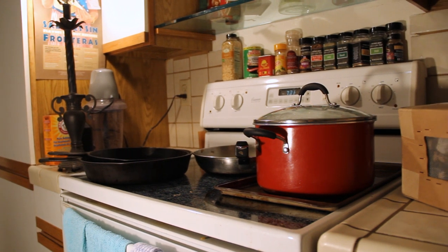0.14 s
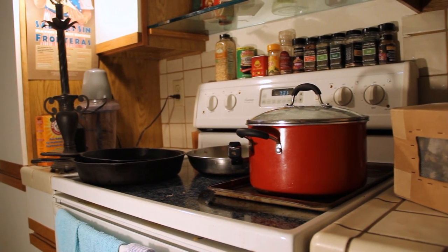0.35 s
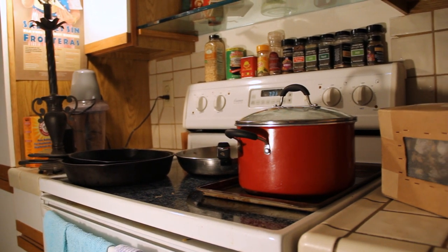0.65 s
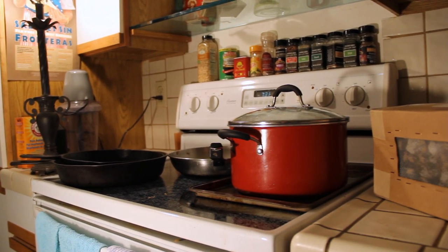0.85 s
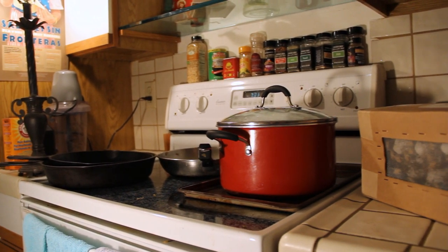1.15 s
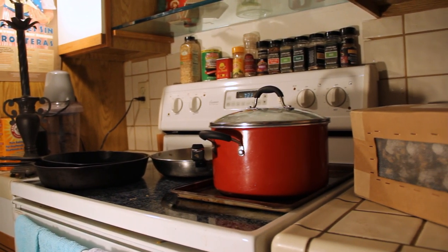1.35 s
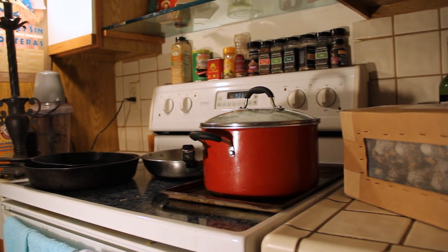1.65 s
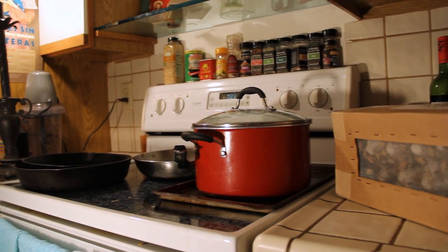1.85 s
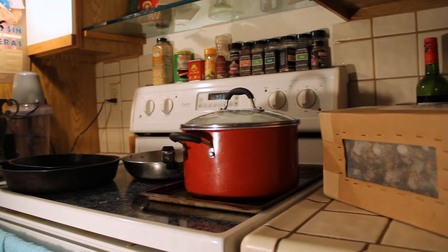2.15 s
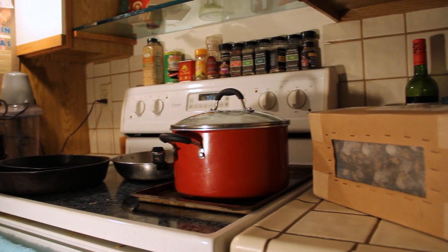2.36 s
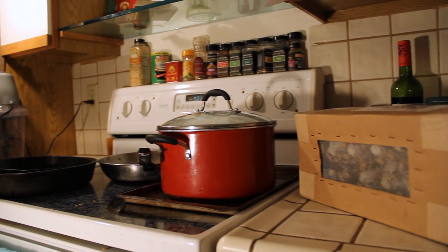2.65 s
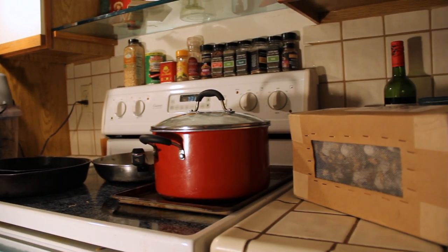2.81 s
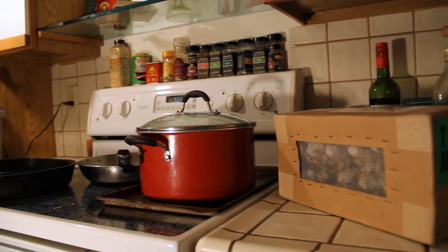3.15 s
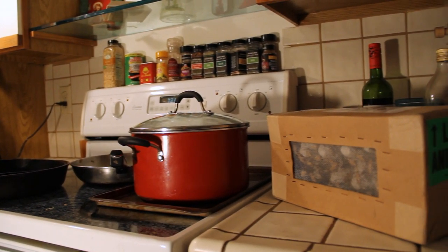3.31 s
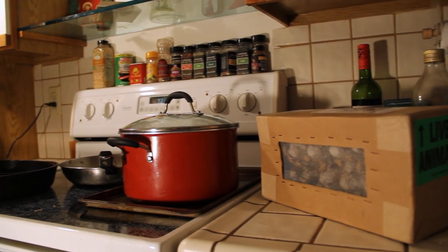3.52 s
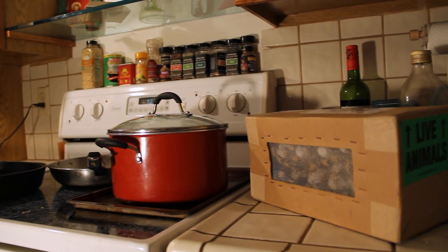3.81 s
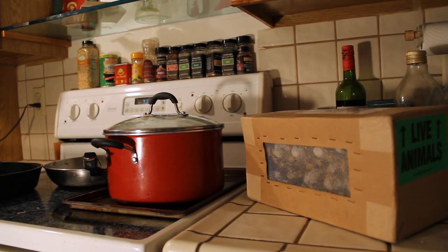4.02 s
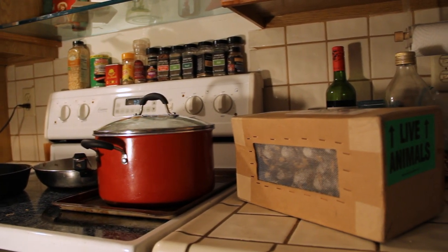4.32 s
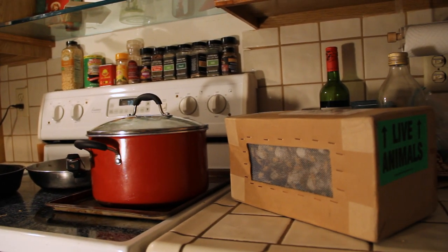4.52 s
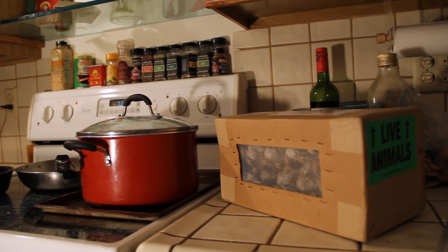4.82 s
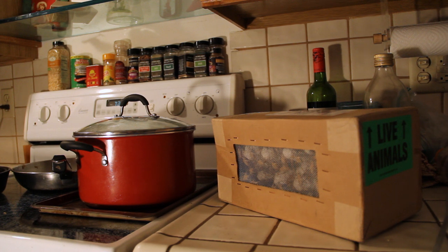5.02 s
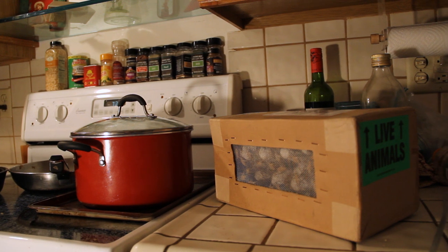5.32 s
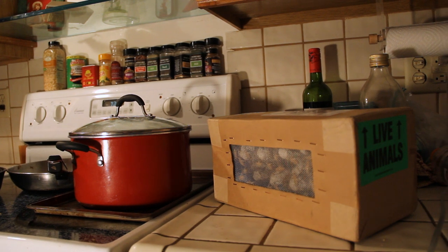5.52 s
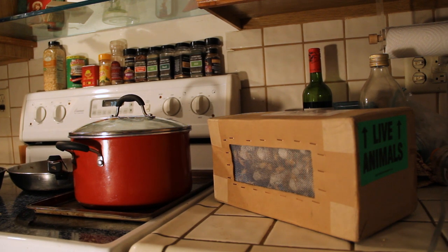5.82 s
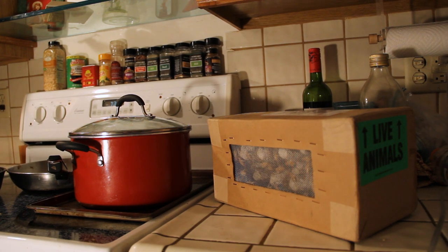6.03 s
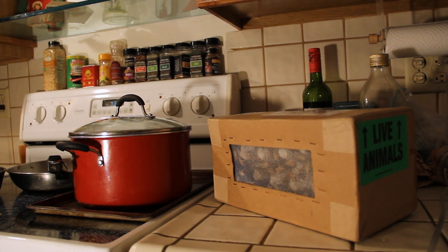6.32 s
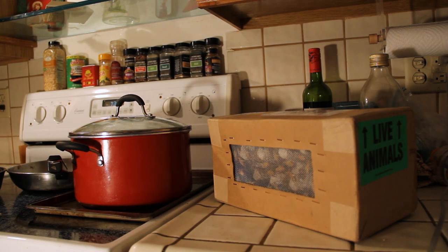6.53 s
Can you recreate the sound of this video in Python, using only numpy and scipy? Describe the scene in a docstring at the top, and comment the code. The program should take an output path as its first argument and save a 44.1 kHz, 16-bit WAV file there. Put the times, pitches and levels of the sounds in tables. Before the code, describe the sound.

A cricket chirps in a quiet kitchen, high-pitched and even, about seven times a second from start to end. A second, much fainter cricket adds dry, scratchy strokes at its own pace, drifting in and out of step and now and then catching a clear pip. An appliance hums softly behind them. One microphone hears it all from a fixed spot, with a short room echo.

```python
"""Crickets in a quiet kitchen

One microphone, indoors, with an appliance humming behind. A cricket chirps evenly, about seven times
a second: four wing strokes, each a falling whistle with its octave, coloured by close reflections and
a short room tail. Pairs of dry, scratchy strokes, likely a second cricket's, keep their own pace and
drift in and out of step with it."""
import sys
import numpy as np
from scipy import signal
from scipy.fft import rfft, irfft, next_fast_len
from scipy.io import wavfile
from scipy.ndimage import uniform_filter1d

SR = 44100
rng = np.random.default_rng(int(sys.argv[2]) if len(sys.argv) > 2 else 0)


def wav_out(sig):
    """Save sig, one row per channel (or a flat mono array), as 16-bit PCM at SR to the path in sys.argv[1]."""
    wavfile.write(sys.argv[1], SR, np.round(np.clip(np.atleast_2d(sig).T, -1, 1) * 32767).astype(np.int16))


N = 293629


def undb(db):
    """Decibels to gain."""
    return 10 ** (np.asarray(db) / 20)


def unit(x):
    """Scale to rms 1."""
    return x / np.sqrt(np.mean(x ** 2))


def add(track, s, sound):
    """Mix a sound into the track, starting at s seconds."""
    i = int(round(s * SR))
    a, b = max(i, 0), min(i + len(sound), len(track))
    if b > a:
        track[a:b] += sound[a - i:b - i]


def noise(colour):
    """Noise of rms 1, shaped by (frequency [Hz], level [dB]) points."""
    hz, db = np.transpose(colour)
    bins_hz = np.arange(N // 2 + 1) * SR / N
    gain = undb(np.interp(np.log(bins_hz + 1), np.log(hz), db))
    return unit(irfft(rfft(rng.standard_normal(N)) * gain, N))


def drift(rate_hz):
    """Smooth random drift of rms 1."""
    hold = int(SR / rate_hz)
    steps = np.repeat(rng.standard_normal(N // hold + 1), hold)
    return unit(uniform_filter1d(steps, hold)[:N])


def resonate(x, hz, width_hz):
    """One resonance, gain 1 at its centre."""
    return signal.lfilter(*signal.iirpeak(hz, hz / width_hz, fs=SR), x)


def room_tone(level_db=-62.0, waver_db=0.2):
    """The kitchen's air: a low, nearly steady noise."""
    # colour of the air: (frequency [Hz], relative density [dB])
    air = [(20, -2), (38, -9), (60, -8.5), (82, 4), (125, -1.5), (165, -9), (300, -9), (450, -7),
           (700, -12.5), (1300, -18.5), (2500, -24.5), (4000, -24.5), (9000, -23.5), (16000, -31)]
    return undb(level_db + waver_db * drift(2.96)) * noise(air)


def appliance_hum(waver_db=1.86, drift_hz=0.627):
    """Motor and mains lines, wavering slightly in pitch and level."""
    # lines of the hum: (frequency [Hz], rms level [dB])
    lines = [(59.2, -71.5), (78.5, -71.5), (87, -82), (120, -68.5), (237, -77), (249.5, -70), (295, -79),
             (472, -75.5), (500, -84.5), (531, -83), (599, -86.5), (749, -84.5)]
    hum = np.zeros(N)
    for hz, db in lines:
        cycles = np.cumsum(hz + drift_hz * drift(4.03)) / SR + rng.random()
        hum += np.sqrt(2) * undb(db + waver_db * drift(7)) * np.sin(2 * np.pi * cycles)
    return hum


def faint_tones():
    """A rising whine and drone, perhaps motors outside, and one brief low note."""
    # course of each tone: (time [s], frequency [Hz], rms level [dB])
    whine = [(0, 571, -73), (.12, 590, -71.5), (.24, 600, -70), (.31, 603, -74), (.42, 635, -97)]
    drone = [(1.2, 117, -97), (1.7, 130, -66.5), (2.5, 148.4, -81), (3.1, 164.6, -73.5), (3.6, 178, -76),
             (4.3, 187, -103)]
    blip = [(.08, 186, -88), (.16, 192, -68), (.22, 194, -76), (.28, 194, -95)]
    t = np.arange(N) / SR
    tones = np.zeros(N)
    for course in (whine, drone, blip):
        s, hz, db = np.transpose(course)
        envelope = np.sqrt(2) * undb(np.interp(t, s, db)) * (t < s[-1])
        tones += envelope * np.sin(2 * np.pi * np.cumsum(np.interp(t, s, hz)) / SR)
    return tones


def room_tail(x, level_db=-24.5, bright_db=-19, t60_s=0.3, delay_s=0.017):
    """The kitchen's diffuse decay, strongest just above the song's pitch."""
    send = undb(level_db) * x + undb(bright_db) * resonate(x, hz=6560, width_hz=260)
    t = np.arange(SR // 2) / SR
    tail = rng.standard_normal(len(t)) * np.exp(-np.log(1000) * t / t60_s) * (t > delay_s)
    return signal.fftconvolve(send, tail / np.sqrt(np.sum(tail ** 2)))[:N]


def reflect(x, strength):
    """Direct sound plus close reflections, which beat against each gliding stroke at the microphone."""
    # walls and other surfaces close to the insects: (delay [ms], relative gain)
    echoes = [(1.774, 0.27), (2.62, 0.66), (3.887, 0.43), (5.135, 0.18), (6.74, 0.18), (9.217, 0.23),
              (11.395, 0.36), (12.695, 0.22), (17.988, 0.12), (24.799, 0.1), (30.924, 0.1)]
    size = next_fast_len(N + 4096)
    khz = np.arange(size // 2 + 1) * SR / size / 1000
    paths = 1 + strength * sum(gain * np.exp(-2j * np.pi * khz * ms) for ms, gain in echoes)
    return irfft(rfft(x, size) * paths, size)[:N]


def chirp_times(pace):
    """Time of every chirp of a cricket that holds its pace between marks."""
    number, s = np.transpose(pace)
    return np.interp(np.arange(round(number[-1]) + 1), np.round(number), s)


def swell(progress, lateness):
    """Wing pressure as a stroke runs from 0 to 1; more lateness, later peak."""
    return np.abs(np.sin(np.pi * progress ** lateness)) ** 1.476


def stroke(seconds, first_hz, last_hz):
    """Time, progress and tooth phase of one wing's scraper slowing along the other's file."""
    progress = np.linspace(0, 1, int(seconds * SR))
    tooth_hz = first_hz + (last_hz - first_hz) * progress
    return progress * seconds, progress, 2 * np.pi * np.cumsum(tooth_hz) / SR


def wing_resonance(x, hz, width_hz):
    """A wing radiates a narrow band: two like resonances in series, each width_hz wide."""
    return resonate(resonate(x, hz, width_hz), hz, width_hz)


def file_rasp(envelope, grain_db=3.5):
    """Noise of the file, grainy because single teeth catch unevenly."""
    # colour of the rasp: (frequency [Hz], relative level [dB])
    colour = [(3000, -48), (4200, -18.5), (4800, 0), (5600, 4.5), (6800, 5.5), (7700, 4), (8700, 2.5),
              (9400, -5), (11300, 0.5), (13500, -6), (16000, -6)]
    return envelope * noise(colour) * unit(undb(grain_db * drift(1500)))


def scratchy_cricket(stroke_s=.013, pitch_spread=0.011, rasp_lead_s=.001):
    """Paired strokes that barely catch the file: a weak wing tone with odd pips, and a rasp envelope."""
    # marks of its pace: (chirp number, time [s])
    pace = [(0, .123), (8, 1.309), (9, 1.468), (11, 1.766), (13, 2.014), (18, 2.763), (21, 3.245),
            (25, 3.843), (26, 3.957), (29, 4.376), (31, 4.668), (37, 5.518), (40, 5.976), (44, 6.568)]
    # its two strokes: (start [ms], rasp [dB], wing tone [dB], scatter between chirps [dB])
    scratches = [(-22.5, -58.5, -58.5, 2.5), (0, -54.8, -56.5, 1.2)]
    # the scraper catches and the wing sounds clearly: (time [s], level [dB])
    pips = [(1.309, -47), (1.766, -41), (2.316, -43.5), (2.462, -46), (2.763, -46), (3.957, -36.5),
            (4.097, -49), (4.232, -47), (4.376, -47), (4.812, -46), (6.25, -39)]

    def whistle(db):
        """One stroke's slightly falling wing tone."""
        speed = 1 + pitch_spread * rng.standard_normal()
        _, progress, phase = stroke(stroke_s, first_hz=5680 * speed, last_hz=5440 * speed)
        return undb(db) * swell(progress, lateness=1) * np.sin(phase)

    tone, rasp_envelope = np.zeros((2, N))
    pressure = swell(np.linspace(0, 1, int(stroke_s * SR)), lateness=.45)
    for s in chirp_times(pace):
        for start_ms, rasp_db, wing_db, scatter_db in scratches:
            at = s + start_ms / 1000
            force_db = scatter_db * rng.standard_normal()
            add(tone, at, whistle(wing_db + force_db))
            add(rasp_envelope, at - rasp_lead_s, undb(rasp_db + force_db) * pressure)
    for s, db in pips:
        add(tone, s, whistle(db))
    return tone, rasp_envelope


def calling_cricket(pitch_spread=0.0024, jitter_ms=.15, spread_db=0.17,
                    grip_s=0.0009, skid_s=0.0056, low_wing_db=5.0):
    """Four strokes of scraper over file to a chirp: the whistle, its octave and a rasp envelope."""
    # marks of its pace: (chirp number, time [s])
    pace = [(0, 0.0426), (2, 0.351), (5, 0.7895), (7, 1.075), (10, 1.4983), (13, 1.9262), (14, 2.0766),
            (16, 2.3645), (17, 2.5123), (19, 2.8199), (20, 2.9691), (24, 3.5735), (27, 4.0099),
            (36, 5.3491), (40, 5.929), (43, 6.3703), (44, 6.513), (45, 6.659)]
    # wing strokes: (start [ms], length [ms], contact after [ms], first pitch [Hz], last pitch [Hz],
    # level [dB], lateness of the swell, relative octave [dB], relative rasp [dB])
    strokes = [(-33.5, 14, 2.05, 5400, 4700, -58.2, 0.46, -29, -14),
               (-19, 8.16, 2.54, 6485, 5640, -37.7, 1, 1, -18),
               (-2.5, 13.56, 2.6, 7228, 5654, -29.7, 1.695, -9, -24),
               (19.5, 16.56, 2.22, 7117, 5586, -28.7, 1.29, -13.5, -21.5)]
    # rasp as a chirp's last stroke skids: (time [s], extra level [dB])
    last_skid = [(0, -3.5), (1.2, 2), (1.4, -3), (2.5, -3), (3.1, -7), (3.7, -2), (4.2, -5), (4.75, 2),
                 (5.1, -1.5), (6.6, -.5)]
    # upper wing resonances that radiate the octave: (frequency [Hz], width [Hz], gain [dB])
    wing_modes = [(11640, 280, -5.5), (12550, 200, -3.5), (12830, 560, 0)]
    tone, octave, rasp_envelope = np.zeros((3, N))
    for s in chirp_times(pace):
        extra_db = np.interp(s, *np.transpose(last_skid))
        for k, row in enumerate(strokes):
            start_ms, length_ms, contact_ms, first_hz, last_hz, db, lateness, octave_db, rasp_db = row
            pitch, timing, force = rng.standard_normal(3)
            speed = 1 + pitch_spread * pitch
            t, progress, phase = stroke(length_ms / 1000, first_hz * speed, last_hz * speed)
            at = s + (start_ms + jitter_ms * timing) / 1000
            # the first stroke only brushes the file, so its teeth come unevenly
            phase += (k == 0) * 0.15 * np.cumsum(rng.standard_normal(len(t)))
            # the wing is already moving when the scraper meets the file
            touching_s = np.maximum(t - contact_ms / 1000, 0)
            gain = undb(db + spread_db * force) * np.minimum(touching_s / grip_s, 1)
            add(tone, at, gain * swell(progress, lateness) * np.sin(phase))
            early_swell = swell(progress, 0.76 * lateness)
            add(octave, at, gain * undb(octave_db) * early_swell * np.sin(2 * phase))
            # the scraper skids before it catches
            skid_db = rasp_db + extra_db * (k == len(strokes) - 1)
            add(rasp_envelope, at, gain * undb(skid_db) * np.exp(-touching_s / skid_s))
    radiated_octave = sum(undb(db) * wing_resonance(octave, hz, width) for hz, width, db in wing_modes)
    # a low wing resonance catches the end of each falling stroke
    tone += undb(low_wing_db) * wing_resonance(tone, hz=5458, width_hz=236)
    return tone, radiated_octave, rasp_envelope


def scene(ring_db=-21, stutter_depth=0.34):
    """Both insects and the kitchen around them, heard in mono from one spot."""
    song, octave, skid = calling_cricket()
    weak_tone, scratch = scratchy_cricket()
    rasp = file_rasp(skid + scratch)
    weak_tone *= 1 + stutter_depth * drift(600)  # teeth catch unevenly
    crickets = reflect(song, strength=0.97) + reflect(octave, strength=0.38)
    crickets += reflect(rasp, strength=1.0) + weak_tone
    tail = room_tail(crickets)
    ring = undb(ring_db) * resonate(crickets, hz=6393, width_hz=26)  # one narrow resonance rings on
    background = room_tone() + appliance_hum() + faint_tones()
    return (background + tail + ring + crickets)[None]


def record(dry):
    """The recorder cuts the top steeply above 15870 Hz."""
    return signal.sosfilt(signal.ellip(10, .2, 70, 15870, fs=SR, output="sos"), dry)


dry = scene()
out = record(dry)
wav_out(out)
```